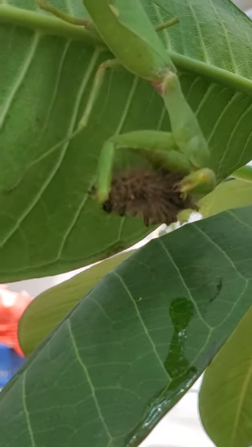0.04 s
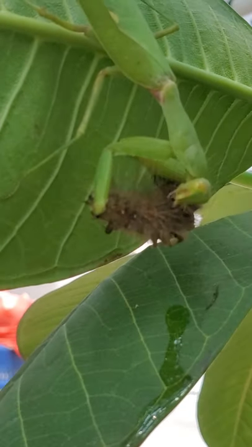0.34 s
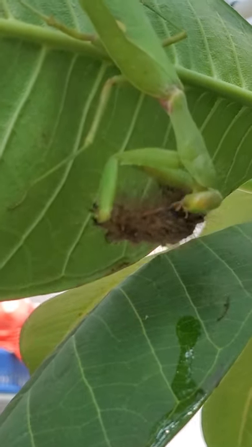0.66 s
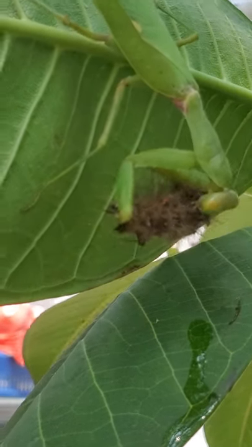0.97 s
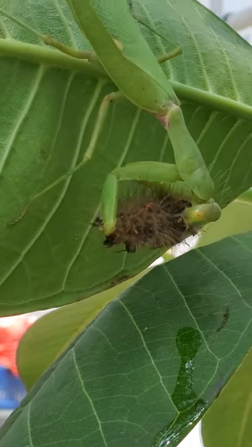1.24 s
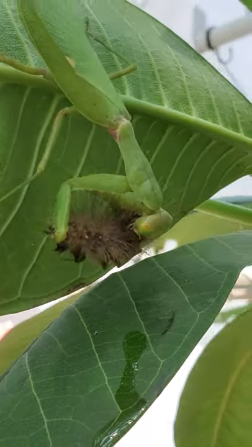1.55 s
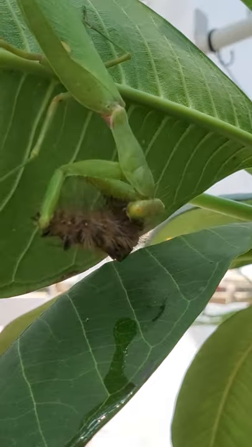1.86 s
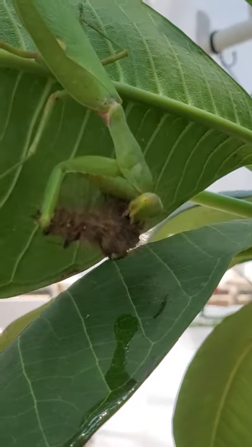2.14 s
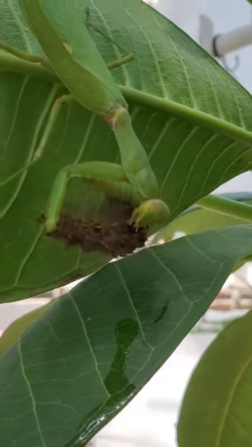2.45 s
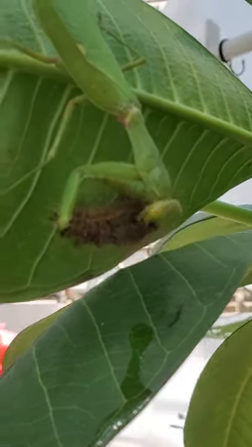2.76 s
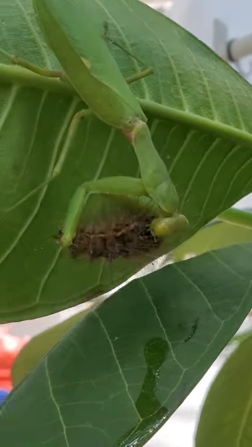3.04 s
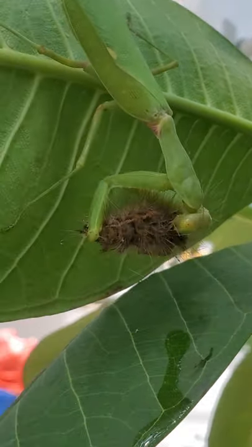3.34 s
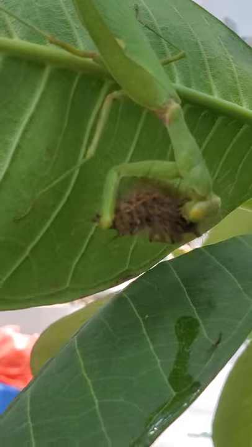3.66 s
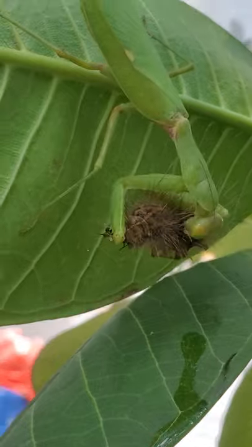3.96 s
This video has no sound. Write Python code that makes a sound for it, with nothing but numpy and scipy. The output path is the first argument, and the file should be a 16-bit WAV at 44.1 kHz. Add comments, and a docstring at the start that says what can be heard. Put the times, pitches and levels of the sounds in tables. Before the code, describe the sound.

Wind rumbles on a microphone close to a leafy shrub outdoors. At first there is only a low murmur of distant traffic, then leaves rustle and tick faintly, and a gust buffets the microphone with uneven thumps.

```python
"""A leafy shrub outdoors, close to a camera. From the start, distant traffic murmurs under a faint
trill, and a motor, probably a cooling unit, hums and whines while the leaves slide softly together.
At about 2 s a breeze rises: the leaves rub harder and crackle, and their edges catch with dry ticks.
From about 2.8 s to the end a gust tumbles over the two microphone ports in low, lumpy buffets."""
import sys
import numpy as np
from scipy import signal
from scipy.fft import rfft, irfft, next_fast_len
from scipy.io import wavfile
from scipy.ndimage import uniform_filter1d, map_coordinates

SR = 44100
rng = np.random.default_rng(int(sys.argv[2]) if len(sys.argv) > 2 else 0)


def materialize(psi):
    """Save the field psi as 16-bit PCM at rate SR to the path in sys.argv[1].

    A 1-D psi becomes a single channel; in a 2-D psi each row is a channel.
    """
    bounded = np.clip(np.atleast_2d(psi).T, -1, 1)
    quanta = np.round(bounded * 32767).astype(np.int16)
    wavfile.write(sys.argv[1], SR, quanta)


N = 176400

# Tone of the traffic and air bed. Each row: frequency in Hz, relative level in dB.
TRAFFIC_SPECTRUM = [(15, -20), (40, 2), (85, 0.5), (112, -4.5), (140, -1.5), (200, -3), (245, -9.5),
                    (360, -8), (460, -13), (570, -11), (680, -16.5), (790, -12.5), (900, -16),
                    (1060, -22.5), (1600, -25.5), (3300, -31), (4200, -34.5), (5200, -35.5), (8000, -40),
                    (13500, -41.5), (15700, -34.5)]
# Stereo width of the bed. Each row: frequency in Hz, left-right correlation (1 is mono).
TRAFFIC_CORRELATION = [(60, 1), (200, 0.97), (380, 0.76), (700, 0.15), (1290, -0.17), (2380, 0.078),
                       (4400, -0.11)]
# Partials of the motor hum. Each entry: a multiple of the shaft rate.
MOTOR_HARMONICS = [8, 11, 12, 13, 15, 16, 21, 22, 24, 64, 66, 67, 68, 69, 70, 71, 72]
# Balance of those partials. Each entry: level in dB.
MOTOR_LEVELS_DB = [-64, -63, -67.5, -67.5, -70, -69, -74, -79, -81.5, -86.5, -84, -80.5, -82.5, -82, -84,
                   -78, -75]
# Tone of leaf rubbing on leaf. Each row: frequency in Hz, relative level in dB.
LEAF_SPECTRUM = [(400, -30), (1200, 14.5), (2200, 12), (4000, 8.5), (7000, 7.5), (10000, 3.5), (15700, 5)]
# Swells of the rustle. Each row: time in seconds, level in dB.
RUSTLE_ENVELOPE = [(0, -65), (.25, -64.5), (.36, -65), (.6, -89), (.86, -63.5), (1.4, -68), (1.9, -64.5),
                   (2.14, -63.5), (2.22, -62), (2.44, -59.5), (2.53, -60), (2.6, -58.5), (2.82, -63.5),
                   (3.05, -56), (3.14, -57.5), (3.25, -62.5), (3.46, -64), (3.56, -59.5), (3.72, -66),
                   (4, -66)]
# Soft scuffs among the leaves. Each row: peak time in seconds, level in dB, half length in seconds,
# band centre in Hz, band width in octaves.
LEAF_SCUFFS = [(0.083, -60, 0.056, 1900, 0.75), (0.853, -66.5, 0.035, 6000, 0.67),
               (0.967, -63.5, 0.047, 2400, 0.77), (2.132, -65, .015, 6540, 0.33),
               (2.437, -63, 0.019, 6600, 0.33), (2.602, -64, 0.017, 6800, 0.32),
               (2.952, -58, 0.009, 5300, .1), (3.045, -61, 0.017, 12300, .12),
               (3.078, -59, 0.0095, 5500, 0.36), (3.221, -54.5, .016, 1900, 0.41),
               (3.545, -62, 0.033, 2380, 0.48)]
# Snaps of leaf edges. Each row: start in seconds, level in dB, band centre in Hz, band width in octaves,
# time to fall 60 dB in seconds, pan as left minus right in dB.
LEAF_TICKS = [(1.965, -56, 10000, .7, .03, -4), (2.267, -47, 6000, 1.2, 0.028, -1),
              (2.274, -52, 11000, .7, 0.056, -6), (2.287, -47, 14000, .29, .02, -6),
              (2.292, -50, 13000, .3, .025, -4), (2.43, -54, 14000, .25, .02, 2),
              (2.463, -48.5, 3000, 0.53, .04, -3), (2.472, -51, 14500, .22, .025, -2),
              (2.478, -53, 13500, .22, .038, -2), (2.491, -41.5, 2800, 0.59, .02, 2),
              (2.497, -57, 12500, .5, .06, -1), (2.503, -49, 3500, .9, .02, 1),
              (2.66, -59, 2820, .3, 0.14, 6), (2.932, -53, 5000, .67, .018, 8),
              (2.957, -54, 3700, .7, .04, 5), (3.21, -46, 2800, 1.1, 0.014, 6)]
# Tone of the buffeting. Each row: frequency in Hz, relative level in dB.
BUFFET_SPECTRUM = [(10, -53), (25, -5), (38, 4), (65, -4), (88, -2.5), (110, -5), (160, -9), (240, -42.5),
                   (500, -53), (1200, -83), (5000, -120)]
# Swells of wind pressure, one table a port. Each row: time in seconds, level in dB.
BUFFET_LEFT = [(0, -72), (2.1, -68), (2.62, -43.5), (3.02, -53), (3.07, -30), (3.2, -32.5), (3.26, -30),
               (3.45, -30.5), (3.5, -38), (3.59, -41), (3.68, -30), (3.79, -30), (3.82, -34), (3.93, -29.5),
               (4, -39)]
BUFFET_RIGHT = [(0, -51), (2.1, -50.5), (2.21, -43), (2.5, -54), (2.74, -42.5), (2.8, -31), (2.87, -37.5),
                (2.91, -29), (3.029, -36.5), (3.109, -51), (3.16, -30), (3.205, -35), (3.29, -31),
                (3.43, -31), (3.49, -40), (3.57, -37), (3.67, -32), (3.76, -35), (3.81, -52), (3.9, -39),
                (4, -43)]
# Tone of an air slap. Each row: frequency in Hz, relative level in dB.
SLAP_SPECTRUM = [(40, -16.5), (130, 7), (200, 1.5), (350, -6.5), (600, -17), (1200, -40), (4000, -70),
                 (8000, -120)]
# Air hitting a port squarely. Each row: peak time and half length in seconds, left and right level in dB.
AIR_SLAPS = [(2.805, 0.0051, -50, -26.5), (2.833, 0.021, -51, -38), (2.923, 0.0043, -46, -36.5),
             (3.019, 0.0075, -55, -36), (3.169, 0.016, -46, -32), (3.233, 0.0053, -42, -25),
             (3.315, .007, -31.5, -42), (3.33, .005, -29, -51), (3.344, 0.0056, -28, -46),
             (3.409, 0.0061, -25, -43), (3.43, .004, -30, -49), (3.609, 0.0093, -50, -38),
             (3.842, .011, -30, -41), (3.88, .006, -32.5, -43), (3.912, .006, -30, -40)]
# Eddies rolling over the ports. Each row: peak time and half length in seconds, pitch in Hz,
# left and right level in dB, likeness of the two ports from 0 to 1.
PORT_EDDIES = [(2.205, 0.011, 80, -45, -36, 0.3), (2.245, 0.01, 95, -48, -36.5, 0.3),
               (2.803, 0.0066, 84, -48, -27, 0.1), (2.832, 0.0054, 70, -50, -32, 0.1),
               (2.9, 0.018, 66, -44, -35, .1), (2.939, .012, 70, -48, -35, .1),
               (3.155, 0.013, 65.5, -33, -16, .3), (3.182, 0.014, 90, -42, -21.5, 0),
               (3.2288, 0.0072, 66.4, -32, -9, 0.2), (3.241, .013, 62, -17, -31, .1),
               (3.268, 0.006, 60, -30, -13, 0), (3.278, 0.015, 80, -22.5, -31, .1),
               (3.312, 0.017, 87, -20.5, -23, 0.6), (3.34, 0.006, 75, -14, -24, 0),
               (3.367, 0.0062, 64, -18.5, -23, 0.84), (3.391, 0.0083, 52, -22, -33, .6),
               (3.417, 0.0086, 84.4, -24.5, -29, 0.5), (3.438, 0.017, 70, -17.5, -29, 0.5),
               (3.526, 0.0067, 68, -37, -21, 0.1), (3.555, 0.012, 62, -26, -23, 0.6),
               (3.613, 0.012, 74, -25, -24, 0.7), (3.648, 0.0099, 80, -18.5, -31, 0.5),
               (3.738, 0.011, 54.4, -16.5, -18, 0.46), (3.754, 0.019, 72, -32, -30, 0),
               (3.862, 0.013, 70, -21.5, -21, 0), (3.884, 0.014, 76, -21, -29, 0),
               (3.919, 0.013, 79, -21.5, -40, .1)]

TRAFFIC_DB, HISS_LEFT_DB = -43.5, 1.2
SHAFT_HZ = 48.37
DRONE_HZ, DRONE_DB = 123.5, -54
WHINE_HZ, WHINE_DB = 11793, -90
TRILL_HZ, TRILL_OCTAVES, TRILL_DB = 4930, 0.11, -74.5
CRACKLES_PER_S, CRACKLE_SPREAD_DB = 200, 2.5
CRACKLE_OFFSET_DB, CRACKLE_SLOPE = -8.5, 1.23  # against the rustle's peak; dB per dB of rustle
TICK_RISE_S = 0.00035
LOW_CUT_HZ, TOP_HZ = 24, 15780


def amp(db):
    """Decibels to gain."""
    return 10 ** (np.asarray(db) / 20)


def unit(x):
    """Scale to rms 1."""
    return x / np.sqrt(np.mean(x ** 2) + 1e-20)


def along(points, hz):
    """Read (Hz, value) points on a log frequency axis."""
    freqs, values = np.transpose(points)
    return np.interp(np.log(hz + 1), np.log(freqs + 1), values)


def curve(rows):
    """One value per sample from (seconds, value) rows."""
    return np.interp(np.arange(N) / SR, *np.transpose(rows))


def wobble(rate):
    """A smooth random drift with `rate` knots a second."""
    knots = rng.standard_normal(int(N * rate / SR) + 4)
    return map_coordinates(knots, [np.arange(N) * rate / SR])


def filtered(x, response):
    """EQ x with a gain given as a function of Hz."""
    n = x.shape[-1]
    padded = next_fast_len(n + 8192)
    gain = response(np.fft.rfftfreq(padded, 1 / SR))
    return irfft(rfft(x, padded) * gain, padded)[..., :n]


def noise(spectrum):
    """Coloured noise of rms 1."""
    return unit(filtered(rng.standard_normal(N), lambda hz: amp(along(spectrum, hz))))


def band_gain(hz, centre_hz, octaves):
    """A bell-shaped band-pass; `octaves` is its standard deviation."""
    return np.exp(-0.5 * (np.log2((hz + 1) / centre_hz) / octaves) ** 2)


def band_noise(centre_hz, octaves):
    """Stereo noise of rms 1 in one band."""
    return unit(filtered(rng.standard_normal((2, N)), lambda hz: band_gain(hz, centre_hz, octaves)))


def bell(peak_s, half_s):
    """A smooth fade in and out, down to 1/e at half_s either side of its peak."""
    t = np.arange(N) / SR - peak_s
    return np.exp(-np.minimum((t / half_s) ** 2, 50))


def puff(x, peak_s, half_s):
    """A bell-shaped burst of x, with rms about 1 at its height."""
    envelope = bell(peak_s, half_s)
    return envelope * x * np.linalg.norm(envelope) / np.linalg.norm(envelope * x)


def traffic():
    """The bed of far traffic and air: nearly mono in the bass, wide in the treble."""
    def mid_side_gains(hz):
        angle = np.arccos(along(TRAFFIC_CORRELATION, hz)) / 2
        return np.array([np.cos(angle), np.sin(angle)])

    def pan_gains(hz):
        left_db = along([(300, -0.04), (1200, -0.54), (4000, 0.05), (12000, HISS_LEFT_DB)], hz)
        return amp([left_db, -left_db])

    murmur = np.array([noise(TRAFFIC_SPECTRUM), noise(TRAFFIC_SPECTRUM)])
    mid, side = filtered(murmur, mid_side_gains)
    stereo = filtered(np.array([mid + side, mid - side]), pan_gains)
    return amp(TRAFFIC_DB + 0.25 * wobble(5.47)) * unit(stereo)


def motor():
    """Harmonics of a slightly unsteady shaft, each fading on its way, with a low drone and thin whine."""
    t = np.arange(N) / SR
    turns = np.cumsum(SHAFT_HZ * (1 + 0.00012 * wobble(3.22))) / SR
    hum = np.zeros((2, N))
    for harmonic, db in zip(MOTOR_HARMONICS, MOTOR_LEVELS_DB):
        phase = 2 * np.pi * (harmonic * turns + rng.random()) + 0.5 * wobble(7)
        for channel in hum:
            channel += amp(db + 2.7 * wobble(4.03)) * np.sin(phase + 0.98 * wobble(2.72))
    drone = amp(DRONE_DB + 3.15 * wobble(4.61)) * np.sin(2 * np.pi * DRONE_HZ * t + 1.2 * wobble(3.45))
    whine = amp(WHINE_DB + 3.7 * wobble(4)) * np.sin(2 * np.pi * WHINE_HZ * t + 0.8 * wobble(9.4))
    return np.sqrt(2) * (hum + drone + whine)  # the sine levels are rms


def trill():
    """A faint flickering band in the treble, perhaps far insects."""
    flicker = amp(2.8 * wobble(60) + 0.68 * wobble(4.4))
    return amp(TRILL_DB) * unit(flicker * band_noise(TRILL_HZ, TRILL_OCTAVES))


def leaf_rustle():
    """Leaves slide over each other in fine, clumped grains, with a few distinct scuffs."""
    grains = amp(1.6 * wobble(500) + 1.7 * wobble(35.27))
    friction = np.array([noise(LEAF_SPECTRUM), noise(LEAF_SPECTRUM)])
    out = amp(curve(RUSTLE_ENVELOPE)) * unit(grains * friction)
    for peak_s, db, half_s, centre_hz, octaves in LEAF_SCUFFS:
        scuff = grains * band_noise(centre_hz, octaves)
        out += amp(db) * np.array([puff(channel, peak_s, half_s) for channel in scuff])
    return out


def leaf_crackle():
    """Sparse tiny snaps that come forward as the leaves rub harder."""
    clicks = (rng.random(N) < CRACKLES_PER_S / SR) * rng.choice([-1, 1], N)
    strengths = amp(CRACKLE_SPREAD_DB * rng.standard_normal((2, N)))
    snaps = filtered(clicks * strengths, lambda hz: amp(along(LEAF_SPECTRUM, hz)))
    rustle_db = curve(RUSTLE_ENVELOPE)
    peak_db = rustle_db.max()
    level_db = peak_db + CRACKLE_OFFSET_DB + CRACKLE_SLOPE * (rustle_db - peak_db)
    return amp(level_db) * unit(snaps)


def leaf_ticks():
    """Leaf edges catch and let go: short dry snaps, each with its own brightness."""
    out = np.zeros((2, N + SR))
    t = np.arange(SR // 6) / SR
    for start_s, db, centre_hz, octaves, t60, pan_db in LEAF_TICKS:
        burst = rng.standard_normal((2, len(t)))
        snap = unit(filtered(burst, lambda hz: band_gain(hz, centre_hz, octaves) * (hz < TOP_HZ)))
        envelope = (1 - np.exp(-t / TICK_RISE_S)) * amp(-60 * t / t60)
        gains = amp([[db + pan_db / 2], [db - pan_db / 2]])
        start = round(start_s * SR)
        out[:, start:start + len(t)] += gains * envelope * snap
    return out[:, :N]


def turbulence(spectrum, evenness):
    """Random pressure swings of rms 1; evenness from 0 to 1 compresses them toward one size."""
    swings = signal.hilbert(noise(spectrum))
    power = np.abs(uniform_filter1d(np.abs(swings) ** 2, size=300))
    smooth_power = uniform_filter1d(power, size=200)
    return unit(swings.real / (smooth_power + 0.17) ** (evenness / 2))


def thump(peak_s, half_s, hz, phase):
    """One eddy's rounded swing of pressure, with rms 1 at its height."""
    t = np.arange(N) / SR - peak_s
    return np.sqrt(2) * bell(peak_s, half_s) * np.cos(2 * np.pi * hz * t + phase)


def wind():
    """Air buffets each port separately; square hits add short slaps and eddies add low thumps."""
    ports = np.array([amp(curve(swells)) * turbulence(BUFFET_SPECTRUM, evenness=0.6)
                      for swells in (BUFFET_LEFT, BUFFET_RIGHT)])
    rasps = noise(SLAP_SPECTRUM), noise(SLAP_SPECTRUM)
    for peak_s, half_s, left_db, right_db in AIR_SLAPS:
        slap = np.array([puff(rasp, peak_s, half_s) for rasp in rasps])
        ports += amp([[left_db], [right_db]]) * slap
    for peak_s, half_s, hz, left_db, right_db, likeness in PORT_EDDIES:
        phase = 2 * np.pi * rng.random()
        lag = np.sign(rng.random() - 0.5) * np.arccos(likeness)  # wide eddies reach both ports alike
        ports[0] += amp(left_db) * thump(peak_s, half_s, hz, phase)
        ports[1] += amp(right_db) * thump(peak_s, half_s, hz, phase + lag)
    return ports


def scene():
    """The mix at the two ports: the distant bed, then the wind and leaves up close."""
    background = traffic() + motor() + trill()
    return background + wind() + leaf_rustle() + leaf_crackle() + leaf_ticks()


def record(dry):
    """The camera rolls off the deepest rumble and keeps nothing above its band limit."""
    return filtered(dry, lambda hz: (hz < TOP_HZ) * hz ** 3 / np.sqrt(hz ** 6 + LOW_CUT_HZ ** 6))


dry = scene()
out = record(dry)
materialize(out)
```